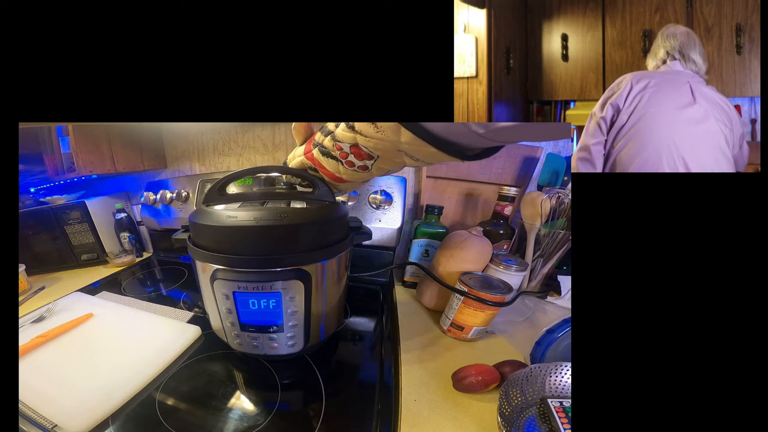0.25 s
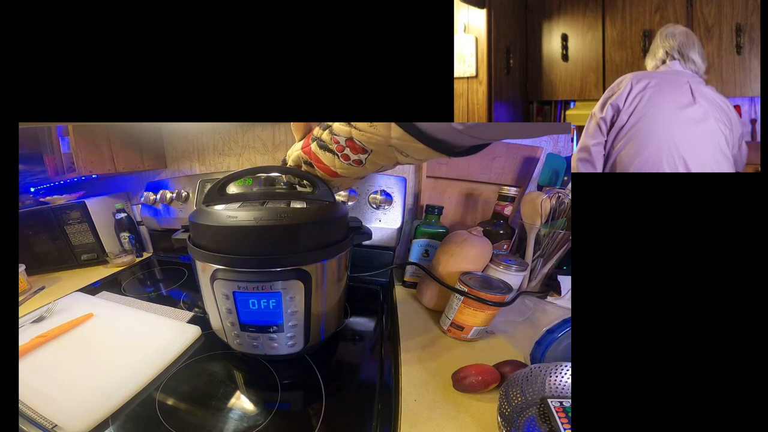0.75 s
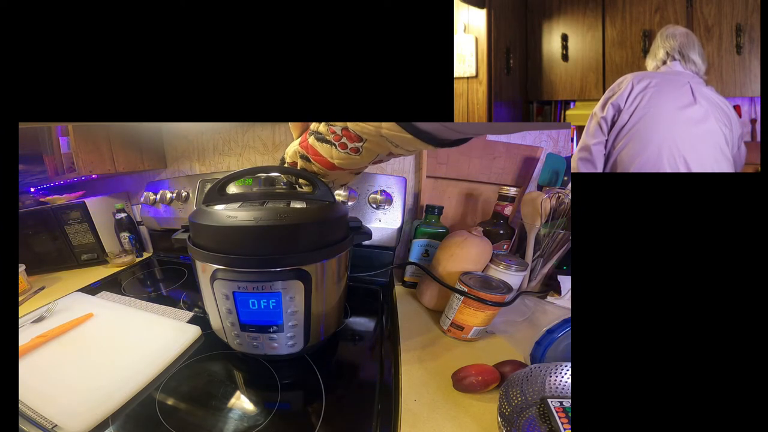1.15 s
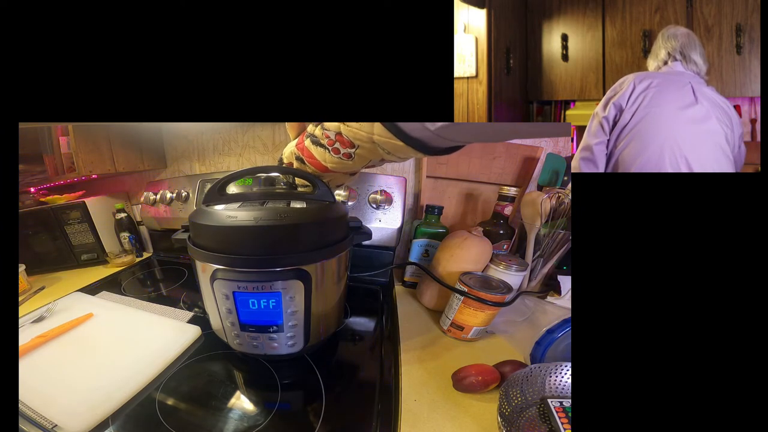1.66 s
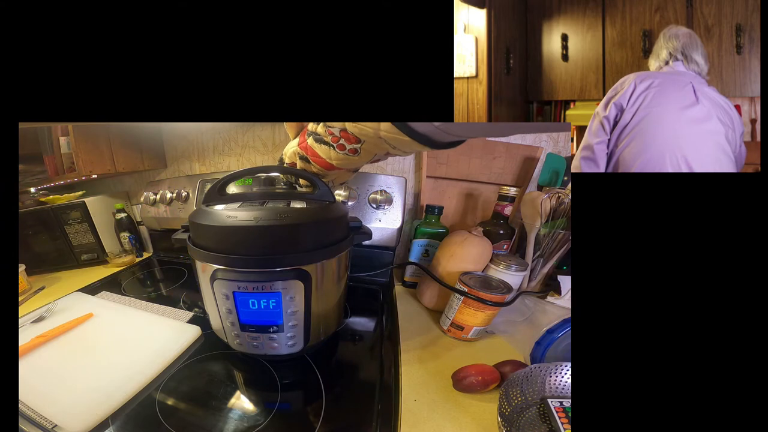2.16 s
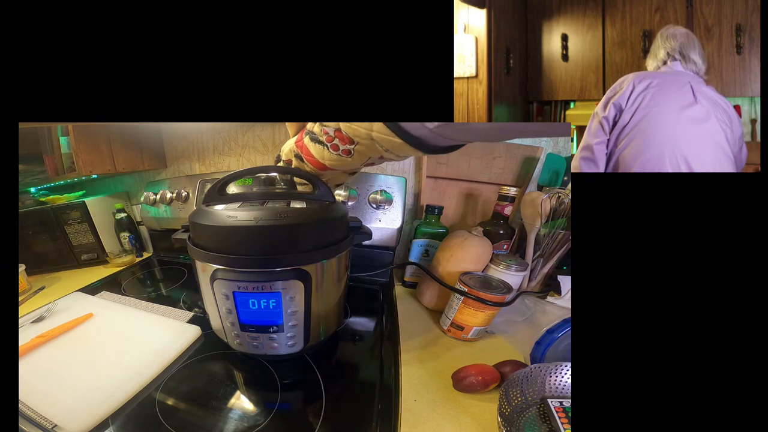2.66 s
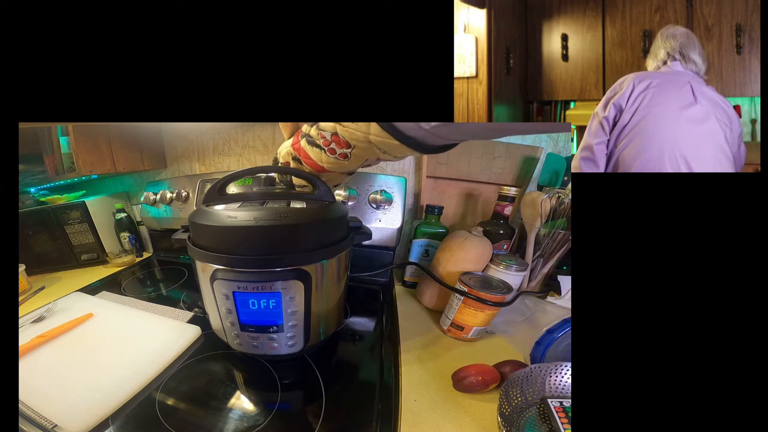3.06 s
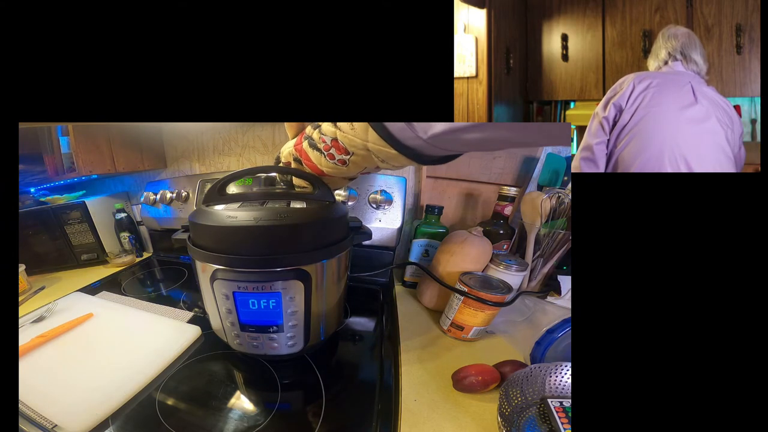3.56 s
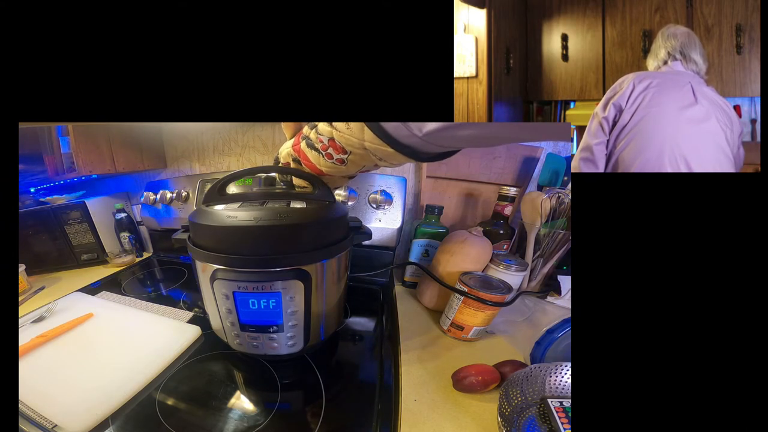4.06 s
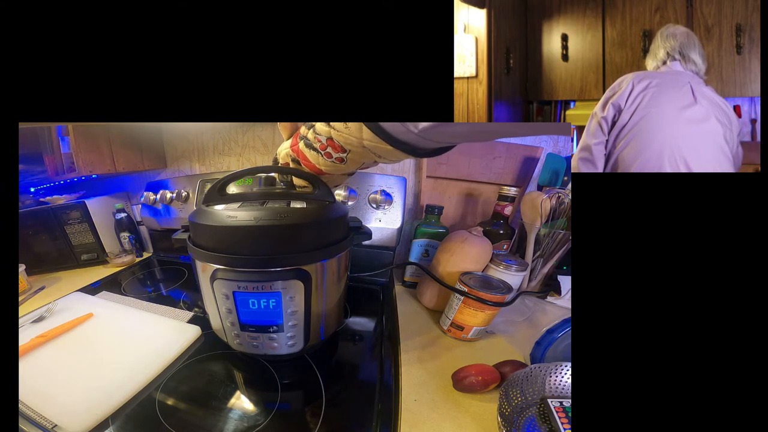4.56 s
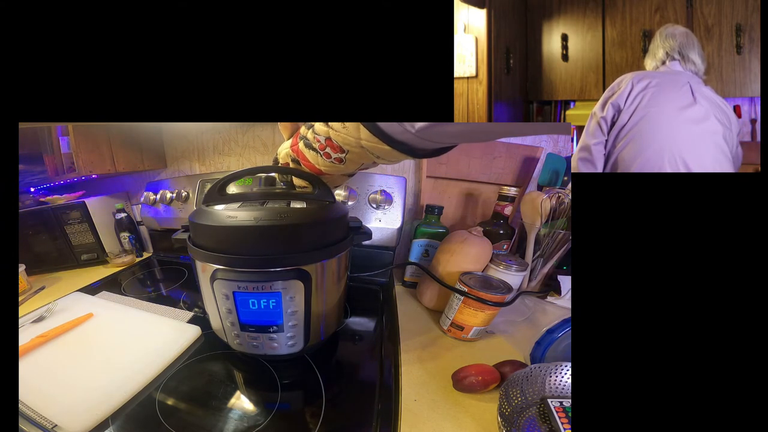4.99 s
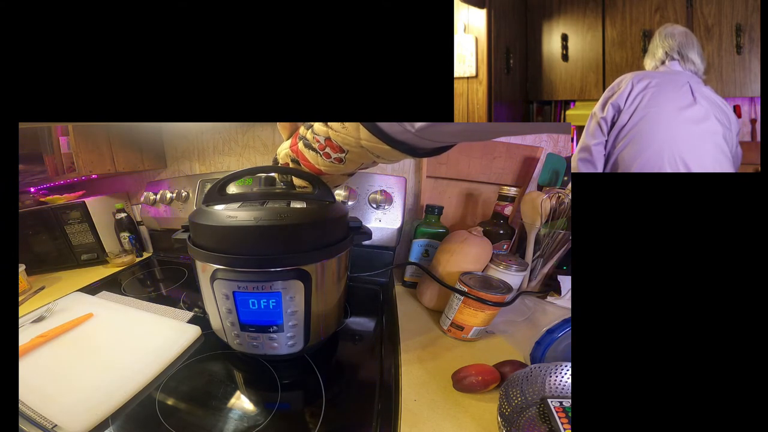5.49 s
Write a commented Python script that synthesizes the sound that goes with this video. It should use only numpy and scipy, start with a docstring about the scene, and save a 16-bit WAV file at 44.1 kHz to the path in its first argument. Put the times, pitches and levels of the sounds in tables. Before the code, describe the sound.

Close by in a small kitchen, a pressure cooker lets out a thin, even hiss of steam. It stops for under a second, and the valve clacks hollowly against the lid. Then the valve opens wide with another, harder knock, and a stronger, fizzing hiss carries on, sputtering lightly with water and easing only slightly. A faint room rumble and electrical buzz lie underneath.

```python
"""Steam hisses from the release valve of a pressure cooker in a small kitchen.
The valve falls shut, knocks on the plastic lid as a hand in a mitt turns it, then opens wider
and spits some condensed water. The rushing steam makes the vent ring at fixed pitches, and the
lid, wall and cupboards add close echoes. Behind it all lie a faint rumble and a mains buzz."""
import sys
import numpy as np
from scipy import signal
from scipy.fft import rfft, irfft
from scipy.io import wavfile

SR = 44100
rng = np.random.default_rng(int(sys.argv[2]) if len(sys.argv) > 2 else 0)


def to_wav(s):
    """Save 16-bit WAV."""
    ch = np.atleast_2d(s).T  # columns
    pcm = np.round(np.clip(ch, -1, 1) * 32767)  # PCM
    wavfile.write(sys.argv[1], SR, pcm.astype(np.int16))


N = 252693
TIME, FREQS = np.arange(N) / SR, np.fft.rfftfreq(N, 1 / SR)

# The tone of each noise. Each row: frequency in Hz, relative level in dB.
ROOM_TONE = [(10, 5), (25, 4.5), (60, -2), (120, -6), (250, -12), (600, -9), (1350, -10), (1620, -13),
             (2000, -17), (4000, -28), (7000, -36), (10000, -33), (11200, -55)]  # the quiet kitchen
MITT_TONE = [(200, -29), (550, -8), (1000, -10), (1450, -10), (1620, 0), (1850, -25), (3000, -15),
             (8000, -55)]  # cloth on plastic
THUD_TONE = [(120, -36), (330, -10), (460, -9), (570, 1), (760, 2), (950, -22), (2500, -50)]  # the hollow thud of the whole lid
CLATTER_TONE = [(150, -41), (350, -24), (650, 3.5), (1250, 1), (1950, 10.5), (2350, -2.5), (3000, 0),
                (4800, -3.5), (6000, -9), (10000, -0.5), (12000, -25)]  # many small vibrations of the lid and pot
DROP_TONE = [(150, -22), (400, -19), (640, -8.5), (900, -1), (1100, 7), (1350, -9), (1900, 0), (2300, -15),
             (3100, -9), (5000, -15.5), (10000, -44), (12000, -62)]  # bursting drops
NARROW_JET_TONE = [(100, -25.5), (250, -24.5), (480, -28), (750, -14), (1500, -13), (2600, -12), (3600, -1),
                   (4400, -15), (6500, -19.5), (8200, -24.5), (10200, -21), (10900, -39), (11800, -41),
                   (12200, -47)]  # steam through the barely open valve
# How the hiss changes with the valve wide open. Each row: frequency in Hz, boost or cut in dB.
WIDE_JET_CHANGE = [(250, -3.5), (1000, 2), (2000, 6), (3000, 6), (3600, -1), (4400, 6.5), (5200, 3),
                   (7000, 9), (11000, 6.5)]
# Where the vent and the hollow under its cap ring. Each row: pitch in Hz, width in Hz, boost in dB.
VENT_RESONANCES = [(570, 25, 5), (687, 40, 4), (1066, 170, 8), (1205, 76, 6), (1421, 38, 6), (1627, 181, 6),
                   (1846, 68, 2), (2010, 133, 3), (2282, 70, -6), (2970, 162, 5), (3123, 187, 3),
                   (3263, 30, -4), (3453, 113, 4), (3572, 120, 7), (3871, 148, 4), (4016, 30, 6),
                   (4205, 68, 5), (4507, 38, 4), (4657, 103, 8), (4894, 107, 7), (5160, 220, 8.5),
                   (5445, 30, 8), (5956, 180, 6), (7198, 432, 6), (8553, 216, 3), (8909, 138, 4)]
# Echoes off the lid and the wall. Each row: delay in milliseconds, strength (minus flips the wave).
CLOSE_ECHOES = [(1.814, -.06), (1.973, .1), (2.676, .08), (2.902, .08), (3.0, -.07), (4.49, .05),
                (4.739, .04), (6.304, -.07)]
# The ticks of the buzz. Each row: time into the mains cycle in milliseconds, level in dB.
BUZZ_TICKS = [(.6, -49), (5.6, -46.5)]
# The mitt rubs the lid. Each row: start in seconds, end in seconds, level in dB.
MITT_STROKES = [(2.775, 3.135, -63.5), (2.835, 2.87, -62)]
# The lid's own notes. Each row: pitch in Hz, relative level in dB, multiple of the knock's ring time.
LID_NOTES = [(360, -19.5, 3.1), (568, -3, 1.8), (707, 3, 1.14), (760, 3, 0.64), (988, 2, 1),
             (1170, -16, 0.63), (1242, 0, 1.3), (1528, 6, 1.14), (1710, -10, 0.78), (1943, 8.5, 0.23),
             (2420, -13, 1.6), (3240, 0, 1.2), (3550, -22, .9), (4300, -17, .7), (4800, -20, .6)]
# The valve hits the lid. Each row: start in seconds, level in dB, treble cutoff in Hz,
# boosted pitch in Hz, loss per bounce in dB, ring time in seconds.
VALVE_KNOCKS = [(2.596, -21, 5500, 1180, -.3, .068), (2.658, -33, 2100, 1250, 8, .055),
                (2.863, -40.5, 2200, 1550, 18, .035), (2.881, -28, 3300, 930, 5, .06),
                (3.018, -48.5, 2000, 1200, 4, .06), (3.345, -13.8, 2400, 1850, 17, .042)]
# Water gushes into the vent. Each row: start in seconds, end in seconds, level in dB.
WATER_GUSHES = [(3.135, 3.165, -46), (3.405, 3.5, -40), (4.595, 4.635, -37.5), (4.715, 4.85, -35),
                (4.86, 5.04, -45)]
# Larger spits of water. Each row: start in seconds, level in dB.
WATER_SPITS = [(4.789, -20), (4.874, -20), (5.022, -26)]
# The valve is held open. Each row: start in seconds, end in seconds, flow in dB, opening from 0 to 1.
STEAM_RELEASES = [(-1, 2.39, -37.6, .07), (3.135, 6, -31.6, .96)]


def gain_of(db):
    """Turns decibels into a number to multiply a sound by."""
    return 10 ** (np.asarray(db) / 20)


def evened(x):
    """Scales a signal to an average (rms) level of 1."""
    return x / np.sqrt(np.mean(x ** 2) + 1e-20)


def curve(tone, freqs=FREQS):
    """Joins the rows of a tone table into a level in dB for every frequency."""
    hz, db = np.transpose(tone)
    return np.interp(np.log(freqs + 1), np.log(hz + 1), db)


def colour(x, db):
    """Turns each frequency of a sound up or down along a dB curve."""
    return irfft(rfft(x) * gain_of(db), N)


def noise(db):
    """Steady noise whose tone follows a dB curve."""
    return evened(colour(rng.standard_normal(N), db))


def wander(rate_hz):
    """A smooth random wobble, mostly slower than rate_hz."""
    return evened(irfft(rfft(rng.standard_normal(N)) / (1 + (FREQS / rate_hz) ** 2), N))


def burst(tone, t, ring_s):
    """Noise that starts at once and fades by 60 dB in ring_s."""
    gains = gain_of(curve(tone, np.fft.rfftfreq(len(t), 1 / SR)))
    spectrum = rfft(rng.standard_normal(len(t))) * gains
    return evened(irfft(spectrum, len(t))) * gain_of(-60 * t / ring_s)


def held(start, end, fade_s=.025):
    """Fades in around start, holds, and fades out around end."""
    return np.clip(np.minimum(TIME - start, end - TIME) / fade_s + .5, 0, 1)


def no_bass(x, cutoff_hz):
    """Cuts the bass, which small, light parts hardly give off."""
    return signal.sosfilt(signal.butter(3, cutoff_hz, "high", fs=SR, output="sos"), x)


def add(mix, start_s, sound):
    """Mixes a sound in at the given time."""
    part = mix[round(start_s * SR):][:len(sound)]
    part += sound[:len(part)]


def room_rumble(level_db=-60):
    """The faint, steady rumble of the quiet kitchen."""
    return gain_of(level_db) * noise(curve(ROOM_TONE))


def mains_buzz(mains_hz=60, cutoff_hz=10300):
    """Electrical switching spikes, two in every mains cycle, blur into a thin buzz."""
    ticks = np.zeros(N)
    for ms, db in BUZZ_TICKS:
        times = np.arange(ms / 1000, TIME[-1], 1 / mains_hz)
        ticks[(times * SR).astype(int)] = gain_of(db)
    softened = signal.sosfilt(signal.butter(12, cutoff_hz, fs=SR, output="sos"), ticks)
    return no_bass(softened * abs(ticks).max() / abs(softened).max(), cutoff_hz=1500)


def kitchen_echoes(x, tail_s=.19, tail_db=-19):
    """Sound scatters off the counter and cupboards, then leaves a short, faint tail."""
    t = np.arange(SR // 3) / SR
    early, late = rng.standard_normal((2, len(t)))
    early *= gain_of(-60 * t / .07) * (t > .005)
    late *= gain_of(-60 * t / tail_s) * (t > .012)
    echoes = .25 * early / np.linalg.norm(early)
    echoes += gain_of(tail_db) * late / np.linalg.norm(late)
    return x + signal.fftconvolve(x, echoes)[:N]


def close_echoes(x):
    """Very quick echoes off the lid and wall strengthen some pitches and weaken others."""
    echoes = sum(gain * np.exp(-2j * np.pi * FREQS * ms / 1000) for ms, gain in CLOSE_ECHOES)
    return irfft(rfft(x) * (1 + echoes), N)


def mitt_rub(roughness_db=3.5):
    """Cloth drags unevenly over the plastic lid."""
    friction = noise(curve(MITT_TONE))
    strokes = sum(gain_of(db) * held(start, end) for start, end, db in MITT_STROKES)
    return friction * strokes * gain_of(roughness_db * wander(rate_hz=36))


def lid_ring(t, ring_s, clatter_db=2):
    """The struck lid rings with its own notes, along with a noisy clatter of lid and pot."""
    signs = rng.choice([-1, 1], len(LID_NOTES))
    notes = sum(sign * gain_of(db - 60 * t / (ring_s * stretch)) * np.sin(2 * np.pi * hz * t)
                for sign, (hz, db, stretch) in zip(signs, LID_NOTES))
    return evened(notes) + gain_of(clatter_db) * evened(burst(CLATTER_TONE, t, ring_s))


def valve_knocks(landings=3, bounce_s=.0112, contact_s=.0004, thud_db=-3.5, boost_db=9):
    """The valve thuds and bounces on the lid; where and how hard it lands sets the tone."""
    out, t = np.zeros(N), np.arange(8192) / SR
    contact = 1 - np.exp(-t / contact_s)  # plastic on plastic builds up fast
    for start, db, cutoff_hz, pitch_hz, loss_db, ring_s in VALVE_KNOCKS:
        thud = no_bass(contact * burst(THUD_TONE, t, ring_s=.09), cutoff_hz=300)
        add(out, start, gain_of(thud_db + 2 * db) * thud)  # doubled dB: only hard knocks thud clearly
        for bounce in range(landings):
            # each bounce is lower and duller than the one before
            pitch_filter = signal.iirpeak(pitch_hz * .95 ** bounce, 4, SR)
            dull_filter = signal.butter(2, cutoff_hz * .78 ** bounce, fs=SR)
            blow = lid_ring(t, ring_s)
            blow += gain_of(boost_db) * signal.lfilter(*pitch_filter, blow)
            blow = signal.lfilter(*dull_filter, blow)
            blow = no_bass(contact * blow, cutoff_hz=285)
            add(out, start + bounce * bounce_s, gain_of(db - bounce * loss_db) * blow / abs(blow).max())
    return out


def water_sputter(flow, opening, drops_per_s=900, wetting_s=1.5, steady_db=-43, drift_db=1.5):
    """Condensed water is torn into drops in the vent: a soft crackle with a few larger spits."""
    sizes = gain_of(np.minimum(rng.exponential(1, N), 3))
    drops = sizes * (rng.random(N) < drops_per_s / SR)
    t = np.arange(4096) / SR
    puff = gain_of(-60 * t / .055)  # every drop bursts in a tiny puff; their powers add up
    power = signal.oaconvolve(drops ** 2, puff ** 2)[:N]
    crackle = evened(colour(np.sqrt(abs(power)) * rng.standard_normal(N), curve(DROP_TONE)))
    # a strong, wide jet slowly draws water into the vent; gushes add to it
    wetness = signal.lfilter([1], [1, -np.exp(-1 / (wetting_s * SR))], opening) * flow
    steady = wetness / wetness.max() * gain_of(steady_db + drift_db * wander(rate_hz=4))
    gushes = sum(gain_of(db) * held(start, end) for start, end, db in WATER_GUSHES)
    out = crackle * np.hypot(steady, gushes)
    for start, db in WATER_SPITS:
        spit = burst(DROP_TONE, t, ring_s=.029) * (1 - np.exp(-t / .0026))
        add(out, start, gain_of(db) * spit / abs(spit).max())
    return no_bass(out, cutoff_hz=287)


def valve_motion(leak_s=.045, lift_s=.024, turn_s=.4, shut_s=.022, sag_db_per_s=.55):
    """Steam flow and opening over time: the valve leaks, lifts, is turned open and drops shut."""
    flow, opening = np.zeros(N), np.zeros(N)
    for start, end, db, width in STEAM_RELEASES:
        age = np.maximum(TIME - start, 0)
        closing = np.exp(-(np.maximum(TIME - end, 0) / shut_s) ** 1.4)
        lift = (1 - np.exp(-age / lift_s)) * closing
        turn = np.sin(np.pi / 2 * np.minimum(age / turn_s, 1))
        leak = gain_of(-22) * held(start - leak_s, start + lift_s, fade_s=lift_s)
        # turning adds the last 3 dB, while the flow sags as the pot loses pressure
        flow += (lift + leak) * gain_of(db - 3 * (1 - turn) - sag_db_per_s * age)
        pinch = .5 * np.sin(np.pi * lift)  # the thin gap of a half-lifted valve brightens the hiss
        opening += width * lift * turn ** 3 + pinch
    return flow, np.clip(opening, 0, 1)


def steam_hiss(flow, opening, flutter_db=.54, fizz_db=.65):
    """Swirling steam makes the vent ring; a wider opening adds body and fizz."""
    vent_db = sum(db / (1 + (2 * (FREQS - hz) / width) ** 2) for hz, width, db in VENT_RESONANCES)
    narrow = noise(curve(NARROW_JET_TONE) + vent_db)
    wide = evened(colour(narrow, curve(WIDE_JET_CHANGE)))
    jet = (1 - opening) * narrow + opening * wide
    # small swirls shake only the treble, large ones the whole jet
    treble = colour(jet, curve([(3000, -40), (5000, 0)]))
    jet += treble * (gain_of(fizz_db * wander(rate_hz=58)) - 1)
    return jet * flow * gain_of(flutter_db * wander(rate_hz=15))


def scene():
    """Steam, water, knocks and mitt echo in the kitchen, over the rumble and buzz."""
    rumble = room_rumble()
    flow, opening = valve_motion()
    vent = close_echoes(steam_hiss(flow, opening) + water_sputter(flow, opening))
    cooker = vent + valve_knocks() + mitt_rub()
    return (kitchen_echoes(cooker) + rumble + mains_buzz())[None]


def record(dry, cutoff_hz=12250, offset=-.0017):
    """Cuts the highest treble and shifts the whole wave slightly below zero."""
    treble_cut = signal.firwin(511, cutoff_hz, window=("kaiser", 9), fs=SR)
    return offset + signal.oaconvolve(dry, treble_cut[None], "same")


dry = scene()
out = record(dry)
to_wav(out)
```